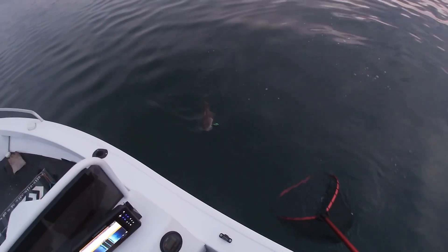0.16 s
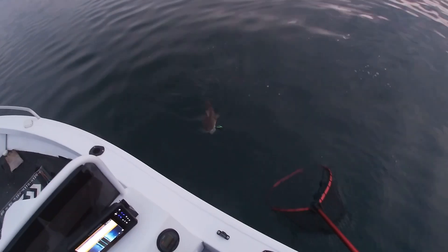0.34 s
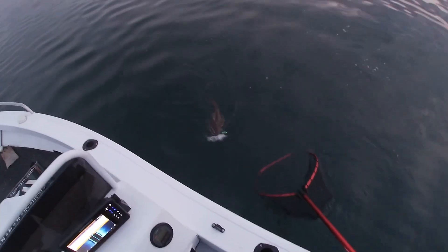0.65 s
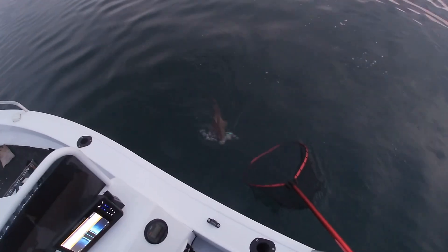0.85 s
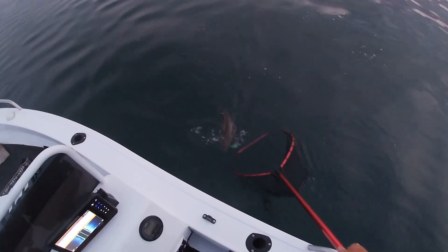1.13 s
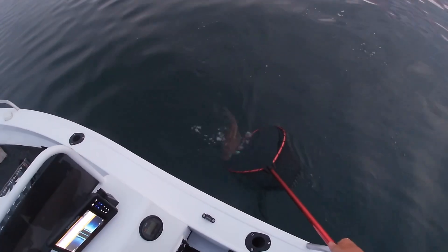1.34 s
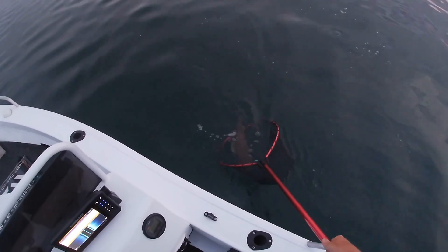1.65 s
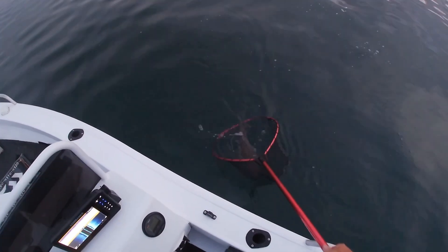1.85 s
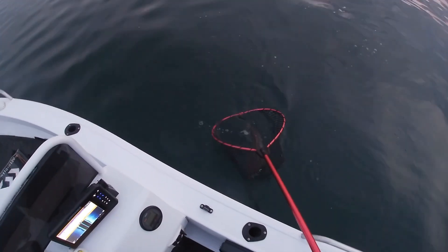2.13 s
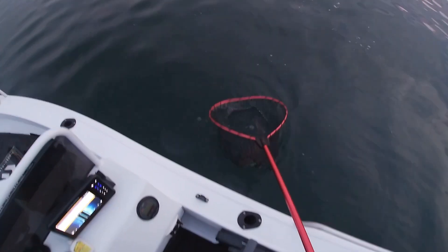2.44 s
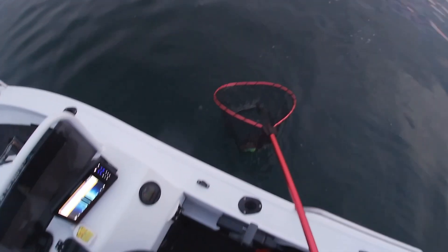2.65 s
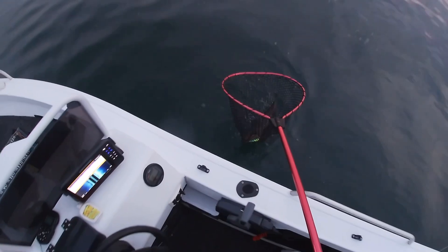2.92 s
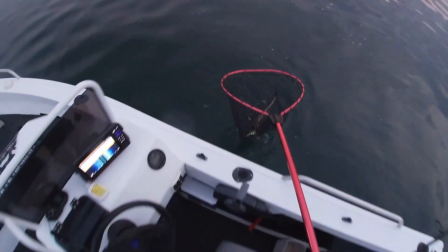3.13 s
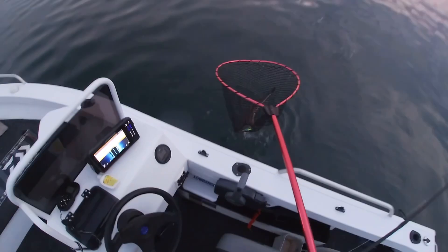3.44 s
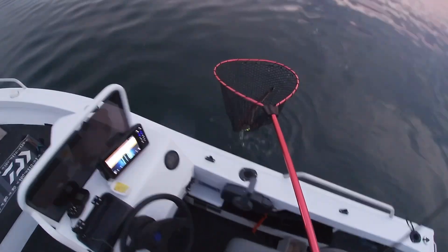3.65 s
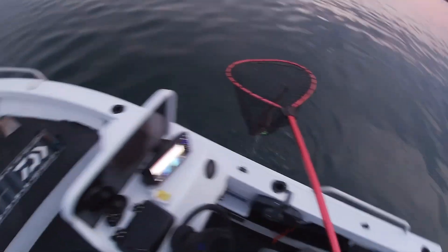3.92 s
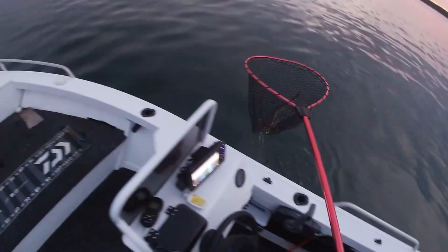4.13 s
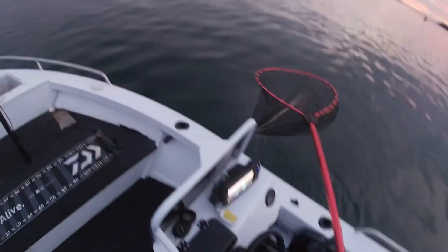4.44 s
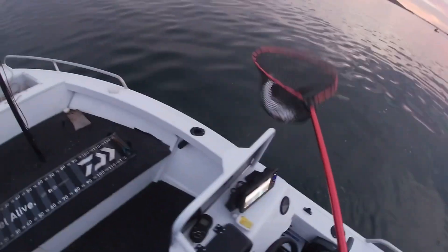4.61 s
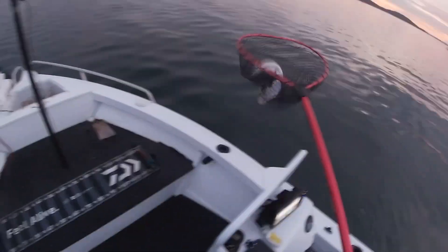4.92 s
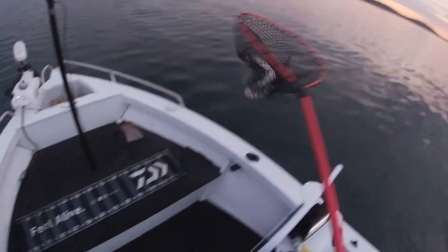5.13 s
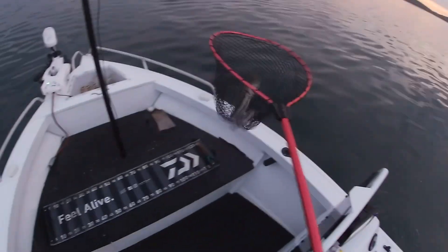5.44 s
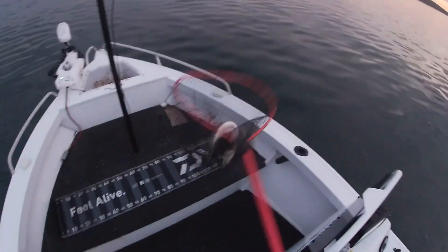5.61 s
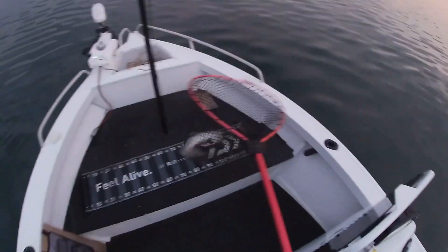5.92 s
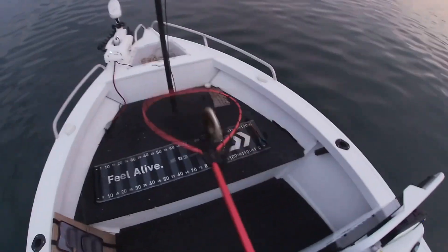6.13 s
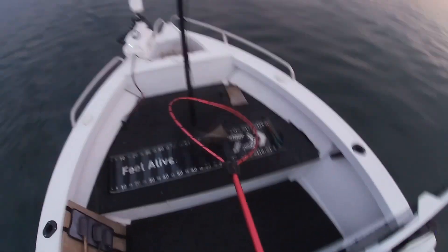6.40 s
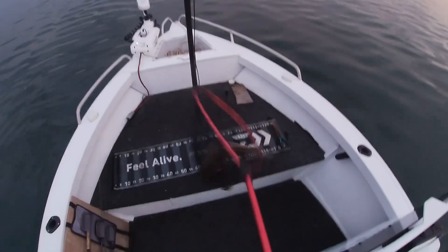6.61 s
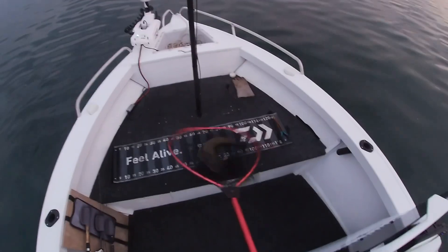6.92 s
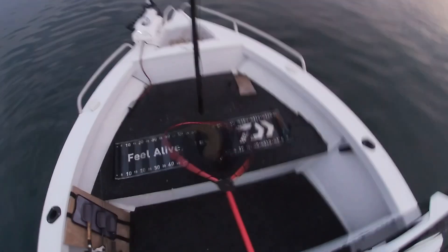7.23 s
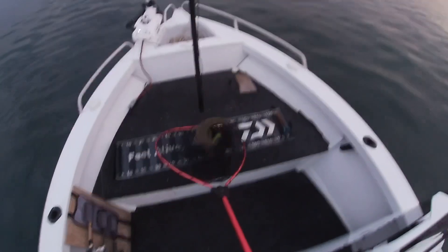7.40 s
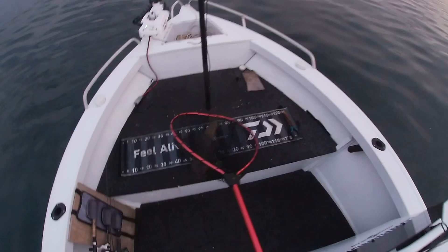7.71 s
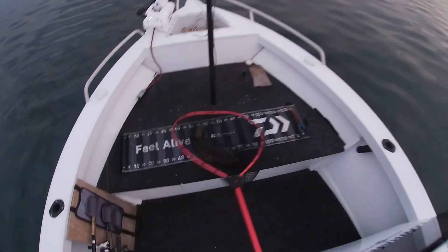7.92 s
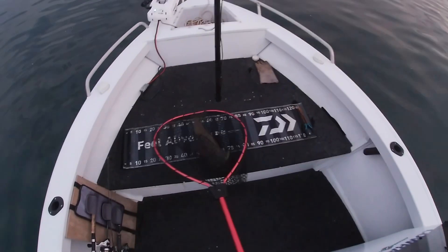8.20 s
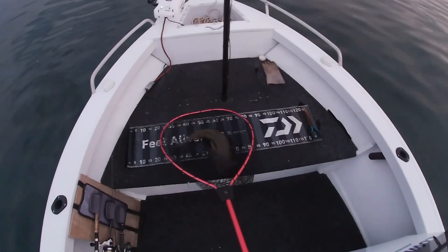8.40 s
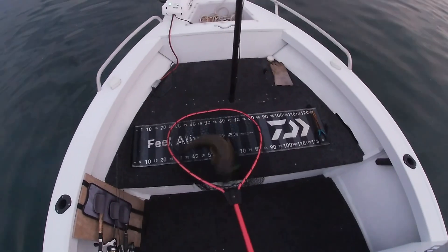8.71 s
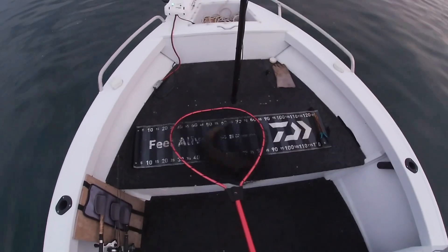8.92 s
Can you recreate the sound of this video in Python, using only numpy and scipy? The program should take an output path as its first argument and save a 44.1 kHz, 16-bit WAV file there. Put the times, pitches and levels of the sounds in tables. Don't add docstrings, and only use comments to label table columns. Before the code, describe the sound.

Outdoors on a quiet boat, heard close through a muffling case: faint hiss and low slosh against the hull, a small slap in the water, gurgling air. Water streams and drips off a lifted net, thinning to higher drops. Wet mesh whips and clicks in the air, a hoop knocks, then drumlike deck thuds, lid raps and wet slaps continue irregularly, gradually weakening as the fish tires.

```python
import sys
import numpy as np
from scipy import signal
from scipy.fft import rfft, irfft
from scipy.io import wavfile
from scipy.ndimage import uniform_filter1d

SR = 44100
rng = np.random.default_rng(int(sys.argv[2]) if len(sys.argv) > 2 else 0)


def output_pcm(signal):
    pcm = np.clip(np.atleast_2d(signal).T, -1, 1) * 32767
    wavfile.write(sys.argv[1], SR, np.round(pcm).astype(np.int16))


def ratio(d):
    e = np.asarray(d, float) / 20
    return 10 ** e


N = 399369
T = np.arange(N) / SR
NET_LIFTS_S = 2.8
OVER_WATER_S = 4.4


def unit(x):
    return x / np.sqrt(np.mean(x ** 2))


def colour(x, shape):
    hz, db = np.transpose(shape)
    log_hz = np.log(np.arange(1, 2050) * SR / 4096)
    cepstrum = irfft(np.interp(log_hz, np.log(hz), db) * np.log(10) / 20)
    cepstrum[1:2048] *= 2
    cepstrum[2049:] = 0
    response = irfft(np.exp(rfft(cepstrum)))
    return signal.fftconvolve(x, response)[:N]


def band(x, lo_hz, hi_hz, order=2):
    sos = signal.butter(order, [lo_hz, hi_hz], "bandpass", fs=SR, output="sos")
    return unit(signal.sosfilt(sos, x))


def walk(rate):
    k = int(SR / rate)
    steps = np.repeat(rng.standard_normal(N // k + 1), k)
    return unit(uniform_filter1d(uniform_filter1d(steps, k), k)[:N])


def grains(rate, spread_db, wash):
    size = ratio(spread_db * rng.exponential(size=N).clip(0, 4.5))
    return unit(size * (rng.random(N) < rate / SR)) + wash


def add(out, s, db, hz, swell, t60, glide, hold=0):
    i = int(s * SR)
    t = np.arange(min(int((swell + hold + t60) * SR), N - i)) / SR
    rise = np.sin(np.pi / 2 * np.minimum(t / swell, 1))
    fall = ratio(-60 * np.maximum(t - swell - hold, 0) / t60)
    pitch = np.minimum(hz * 2 ** (glide * t), 2.2 * hz)
    out[i:i + len(t)] += ratio(db) * rise * fall * np.sin(2 * np.pi * np.cumsum(pitch) / SR)


def add_burst(out, s, db, lo_hz, hi_hz, order, t60, length):
    i, t = int(s * SR), np.arange(length) / SR
    noise = band(rng.standard_normal(length), lo_hz, hi_hz, order)
    out[i:i + length] += noise * ratio(db - 60 * t / t60) * np.minimum(t / 0.0008, 1)


# (t/s, rocking level/dB, slosh level/dB)
LAPPING = [(0.0, -43, -37.5), (0.4, -32, -40.5), (0.85, -45.5, -41), (1.69, -36.5, -35), (1.91, -41.5, -40),
           (2.49, -47, -42), (2.97, -41.5, -43.5), (3.53, -43, -40.5), (4.49, -34, -38.5),
           (4.84, -28.5, -36), (5.59, -35.5, -43.5), (5.9, -40.5, -37.5), (6.35, -35.5, -46.5),
           (6.75, -33.5, -35), (7.64, -31, -39.5), (7.86, -31, -39.5), (8.44, -39, -43.5),
           (9.05, -40.5, -38.5)]
# (f/Hz, level/dB per Hz)
HISS_TONE = [(300, -26), (460, -29), (750, -43), (1020, -48.5), (1900, -50.5), (2760, -37.5), (3100, -41.5),
             (3500, -41.5), (4600, -55.5), (6700, -62), (8300, -81), (13500, -82.5)]


def hull():
    s, roll_db, slosh_db = np.transpose(LAPPING)
    roll_db, slosh_db = np.interp(T, s, roll_db), np.interp(T, s, slosh_db)
    surge = 1.3 * walk(9)
    flicker = surge + 2.8 * walk(30)
    roll = band(rng.standard_normal(N), 27.3, 76.8) * ratio(roll_db - 4 + surge + 3 * walk(8))
    slosh = band(rng.standard_normal(N), 85.8, 230.4, order=3) * ratio(slosh_db + surge + 1.5 * walk(15))
    gurgle = band(rng.standard_normal(N), 210, 716, order=3) * ratio(slosh_db - 22 + flicker)
    hiss_db = -52.5 + .8 * walk(6) - 2.5 * np.clip(T - NET_LIFTS_S, 0, 1)
    hiss = unit(colour(rng.standard_normal(N), HISS_TONE)) * ratio(hiss_db)
    ticking = uniform_filter1d(grains(21, 3.5, 0.22), size=200) * ratio(-77 + 2 * walk(3.04))
    return roll + slosh + gurgle + hiss + ticking * band(rng.standard_normal(N), 3400, 11000)


# (t/s, peak level/dB, f/Hz)
HULL_LURCHES = [(0.163, -25, 46.5), (0.453, -35, 61), (0.672, -39, 59.2), (1.742, -33, 69.5),
                (3.352, -34, 38.5), (4.415, -37, 38), (4.668, -22, 46.8), (5.257, -40, 48),
                (5.51, -27, 51.1), (5.935, -23, 67.6), (6.724, -19, 67), (7.516, -26, 61.3),
                (7.676, -22, 48.4), (8.355, -33.5, 67.3), (8.593, -26.5, 47)]


def lurches():
    out = np.zeros(N)
    for s, db, hz in HULL_LURCHES:
        add(out, s, db + 0.5, hz, swell=1.37 / hz, t60=9 / hz, glide=-1.5)
    return out


# (t/s, peak level/dB, f/Hz)
SPRAY_TICKS = [(0.1381, -57, 6730), (1.2905, -56.5, 6550), (2.1854, -57, 6000), (2.7057, -52, 5420),
               (2.831, -58, 5900), (3.925, -39, 8300), (4.022, -42, 7300), (4.316, -45, 7500)]


def spray_ticks():
    out = np.zeros(N)
    for s, db, hz in SPRAY_TICKS:
        add(out, s, db + 2.5, hz, swell=.0006, t60=.009, glide=0)
    return out


# (t/s, peak level/dB, f/Hz, t60/s)
FISH_SPLASH = [(.7205, -20, 1313, 0.013), (.7212, -28.5, 3000, .012), (.7235, -37, 4880, 0.0068),
               (.726, -22, 970, 0.01), (.739, -33.5, 730, 0.0099), (.739, -37, 3170, 0.0091)]


def splash():
    out = np.zeros(N)
    for s, db, hz, t60 in FISH_SPLASH:
        add(out, s, db, hz, swell=.0015, t60=t60, glide=-25)
    return out


# (t/s, peak level/dB, f/Hz, swell/s, t60/s)
AIR_GULPS = [(.757, -45, 520, 0.0097, 0.081), (.785, -40.5, 360, 0.0079, 0.073),
             (0.814, -35, 260, 0.0072, 0.062), (0.978, -28.5, 200, 0.036, 0.14),
             (3.119, -40.5, 333.6, 0.014, 0.18), (4.135, -35.5, 402, 0.0039, 0.041),
             (4.21, -53, 675, 0.0098, 0.14)]


def gulps():
    out = np.zeros(N)
    for row in AIR_GULPS:
        add(out, *row, glide=1.5)
    return out


# (t/s, peak level/dB, f/Hz, glide/octaves per s)
AIR_BUBBLES = [(0.118, -48, 563, -12), (0.405, -47.5, 780, 22.5), (.433, -44, 814, 18.5),
               (.457, -55, 885, 9), (.478, -53, 873, 4), (.735, -52, 760, -14), (.812, -46, 900, 29),
               (0.965, -46, 798, 3.5), (1.138, -51, 1430, -14), (1.31, -58, 1280, 6),
               (1.779, -48.5, 1730, 13), (2.03, -46.5, 735, 2.5), (2.041, -42.5, 427, 9),
               (2.998, -38.5, 2140, 5), (3.059, -38.5, 910, 8.5), (3.084, -37, 380, -3),
               (3.525, -56, 950, 4), (3.934, -49, 1940, 6), (3.296, -49, 1380, -11), (3.369, -39, 320, 2.5),
               (3.905, -42, 520, 2.5), (3.585, -42.5, 698, 11), (3.9, -38, 326, 3),
               (3.904, -38, 1300, -0.5), (3.983, -52, 1270, 10), (4.182, -39, 1970, 2),
               (4.247, -48, 1330, -10), (6.872, -29, 757, -16), (3.04, -49, 645, 7.5),
               (5.872, -43, 240, -0.5), (5.871, -41.5, 476, 0), (3.275, -39, 1760, -1.5),
               (4.81, -29, 1730, 2)]


def bubbles():
    out, chirp = np.zeros((2, N))
    for s, db, hz, glide in AIR_BUBBLES:
        cycles = 52 + .3 * abs(glide)
        add(out, s, db, hz, 0.9 / hz, cycles / hz, glide)
    chirp_s, chirp_length_s = 3.221, .046
    add(chirp, chirp_s, -43, 830, swell=.004, t60=.35, glide=28)
    return out + chirp * np.clip((chirp_s + chirp_length_s - T) / 0.0084, 0, 1)


# (t/s, peak level/dB, f/Hz)
BUBBLE_POPS = [(2.8903, -46, 2530), (2.915, -39, 1860), (2.9362, -38, 1660), (2.969, -40, 1120),
               (2.9986, -35, 2140), (3.0206, -25, 2670), (3.0591, -34, 940), (3.139, -40, 1130),
               (3.2196, -43, 890), (3.258, -30.5, 1850), (3.2969, -29.5, 1890), (3.3203, -43, 2160),
               (3.3364, -35, 1370), (3.3533, -35, 1740), (3.3772, -27, 2380), (.868, -38, 2900),
               (3.655, -41, 1250), (3.5254, -36.5, 925), (3.5718, -49, 2100), (3.5842, -47, 902),
               (3.6016, -41, 2350), (3.6236, -38, 940), (3.7, -47, 1090), (3.657, -38, 1800),
               (3.8561, -43, 1640), (3.9026, -42, 1380), (3.934, -47, 1960), (3.9854, -50, 1290),
               (4.0701, -42, 2370), (4.1824, -39, 1960), (4.061, -53, 890), (4.2417, -44, 1290),
               (4.274, -42, 1210), (4.2956, -45, 2390), (4.352, -30, 1780)]


def pops():
    out = np.zeros(N)
    for s, db, hz in BUBBLE_POPS:
        add(out, s, db - 4.0, hz, swell=0.68 / hz, t60=24 / hz, glide=6)
    return out


# (t/s, level/dB)
DRAINING = [(2.8, -78), (2.92, -51.5), (3.05, -43.5), (3.16, -58), (3.33, -50.5), (3.46, -58), (3.7, -58.5),
            (4.33, -52), (4.42, -40.5), (5.72, -38), (5.9, -42.5), (6.02, -36), (6.27, -43.5), (6.6, -32),
            (6.9, -43.5), (7.45, -43), (8.05, -40), (8.29, -41.5), (9.06, -40)]


def drain():
    s, db = np.transpose(DRAINING)
    stream_hz, thin_hz, thins_s, thinning_s = 1770, 5080, 3.755, 0.072
    swarm = np.zeros(N)
    for when, octave, size, cycles in rng.random((800, 4)):
        at = NET_LIFTS_S + when * (OVER_WATER_S - NET_LIFTS_S)
        centre = stream_hz + (thin_hz - stream_hz) / (1 + np.exp((thins_s - at) / thinning_s))
        pitch = centre * 2 ** (2.14 * (octave - .35))
        add(swarm, at, 7 * size ** 3 - 21, pitch, 1.5 / pitch, (8 + 30 * cycles ** 3) / pitch, 6)
    fizz = band(grains(1500, 3, .8) * rng.standard_normal(N), 610, 7500, order=1)
    both = ratio(22.5) * swarm + ratio(-11.0 - 2.5 * (T < OVER_WATER_S)) * fizz
    return both * ratio(np.interp(T, s, db, left=-120) + 2.2 * walk(30))


# (t/s, peak level/dB, f/Hz)
WATER_DRIPS = [(2.9436, -37, 2030), (2.975, -39, 2130), (3.694, -31.5, 3960), (3.0598, -50, 2800),
               (3.2275, -41, 2650), (3.2579, -40, 3150), (3.2963, -40, 2030), (3.354, -33, 2050),
               (3.3756, -33, 2500), (3.475, -33.5, 3530), (3.033, -55, 3400), (3.5867, -38, 3600),
               (3.6005, -30.5, 2360), (3.6334, -39, 4460), (3.648, -29, 2970), (3.6847, -27.5, 3600),
               (3.7374, -32.5, 5600), (3.819, -31.5, 3840), (3.854, -27, 4760), (3.8948, -26.5, 4280),
               (3.9224, -30.5, 2060), (3.994, -35, 5930), (4, -33, 2910), (4.049, -41, 6300),
               (4.0691, -35, 5500), (4.112, -32.5, 4660), (4.1818, -37, 2200), (4.207, -40, 6860),
               (4.296, -38, 2390), (4.3552, -32.5, 2100)]
# (t/s, peak level/dB, f/Hz)
FLUNG_DROPS = [(0.72, -24.5, 1570), (4.182, -38, 2900), (4.954, -31, 1400), (5.077, -26, 5830),
               (5.434, -27, 2900), (6.422, -36, 1270), (6.671, -27, 5930), (7.1004, -36, 1200),
               (7.1534, -29, 2670), (7.298, -35, 1060), (8.743, -24, 1020), (4.783, -28, 1000),
               (3.384, -34.5, 2600), (8.4, -16, 960), (4.809, -23, 1810), (6.3844, -21.5, 935),
               (6.432, -29, 1250), (8.043, -24, 1010), (7.592, -16, 3710)]


def drops():
    out = np.zeros(N)
    for s, db, hz in WATER_DRIPS + FLUNG_DROPS:
        add(out, s, db - 7.0, hz, swell=.0007, t60=.012, glide=12)
        add_burst(out, s, db - 12.5, .7 * hz, 2.4 * hz, order=2, t60=0.045, length=1200)
    add(out, .15, -29.5, 12000, swell=.001, t60=.006, glide=0)
    return out


# (t/s, peak level/dB, panel f/Hz, swell/s)
DECK_BLOWS = [(5.81, -23, 174, 0.004), (5.943, -9.5, 269.6, 0.004), (5.943, -15, 414, 0.0015),
              (5.952, -11.5, 115.5, 0.0039), (5.955, -13.5, 206, 0.0098), (5.96, -29.5, 381, 0.011),
              (6.33, -31, 405, 0.01), (6.504, -11, 56, 0.011), (6.511, -11, 124, 0.0094),
              (6.73, -10.5, 115.5, 0.0072), (6.78, -16, 262, 0.012), (6.838, -12, 115.5, 0.0079),
              (6.93, -13.5, 121.6, 0.011), (7.072, -14, 56.6, 0.012), (7.244, -8, 856, 0.00068),
              (7.244, -13.5, 265, 0.0023), (7.247, -17, 471, 0.0028), (7.251, -15.5, 55.7, 0.0036),
              (7.52, -25.5, 119.6, 0.0072), (7.643, -26.5, 108, 0.004), (7.707, -25, 97.5, 0.0072),
              (7.777, -21, 116, 0.0018), (8.13, -26, 61.5, 0.036), (8.199, -22, 115, 0.017),
              (8.138, -24.5, 151, 0.0072), (8.629, -30, 191.4, 0.027)]


def deck():
    out, shake = np.zeros((2, N))
    for s, db, hz, swell in DECK_BLOWS:
        off = rng.standard_normal(2)
        t60 = 0.14 * (100 / hz)
        big = hz < 140
        add(out, s, db - 2.6 * big, hz, swell, t60, -.6, hold=0.017 * big)
        add(out, s, db - 10.5, 1.59 * hz * (1 + 0.063 * off[0]), 0.59 * swell, t60, 0)
        add(out, s, db - 17.5, 2.67 * hz * (1 + 0.11 * off[1]), 0.42 * swell, 0.54 * t60, 0)
        i = int(s * SR)
        late = T[:min(SR // 2, N - i)]
        fade = ratio(2 * db - 120 * late / (0.32 + 0.18 * t60))
        shake[i:i + len(late)] += fade * np.minimum(late / swell, 1)
    add(out, 5.812, -54, 2850, swell=.002, t60=.5, glide=0)
    add(out, 5.812, -50, 5020, swell=.002, t60=.5, glide=0)
    rumble = np.sqrt(shake) * band(rng.standard_normal(N), 56, 320) * ratio(-18.5)
    return out * ratio(1.5 * walk(90)) + rumble


# (t/s, peak level/dB, f/Hz)
LID_RAPS = [(6.337, -29.5, 1230), (6.386, -24, 960), (6.434, -23.5, 1260), (6.489, -28, 1370),
            (6.515, -15.5, 1060), (6.697, -24, 796), (6.756, -20, 1010), (6.777, -11.5, 1013),
            (6.87, -30, 885), (7.002, -25.5, 940), (7.071, -15, 1254), (7.127, -24, 960),
            (7.207, -26.5, 1005), (7.246, -16, 930), (7.43, -31, 890), (7.49, -27, 1050),
            (7.504, -16.5, 1123), (7.59, -23, 935), (7.678, -24.5, 1270), (7.709, -26, 800),
            (5.812, -16, 1050), (5.81, -12, 2200), (7.852, -24.5, 1030), (8.045, -21, 973),
            (8.134, -21, 1020), (8.168, -26.5, 1064), (8.399, -31, 987), (8.47, -25, 1060),
            (8.564, -28, 988), (8.661, -27, 1100), (8.743, -39, 990), (8.907, -30, 1080), (8.975, -26, 982)]


def raps():
    out = np.zeros(N)
    for s, db, hz in LID_RAPS:
        add(out, s, db - 5, hz, swell=.0012, t60=.03, glide=0)
    return out


# (t/s, peak level/dB, f/Hz)
TAUT_SNAPS = [(4.4702, -21.5, 2380), (4.5905, -4, 2800), (4.7207, -13, 2890), (4.8935, -7, 6840),
              (5.006, -16.5, 1780), (5.142, -25, 1920), (5.3596, -14, 4800), (5.5052, -14.5, 2500),
              (5.5456, -10.5, 2250), (5.6, -6, 7300), (5.6697, -13, 3480), (5.8091, -5, 2230),
              (5.9895, -8, 2810), (6.0311, -3.5, 2000), (6.1747, -15, 4170), (6.327, -18, 3060),
              (6.38, -26.5, 1930), (6.483, -20, 3260), (6.6253, -13, 2240), (6.6977, -19.5, 2230),
              (6.999, -9.5, 2880), (7.206, -22, 2490), (7.456, -17, 1890), (7.5903, -15, 3120),
              (7.616, -27, 2850), (7.707, -21.5, 2300), (7.7475, -19.5, 2900), (7.795, -18.5, 2200),
              (7.877, -13.5, 4300), (8.4747, -19, 1800), (8.567, -23, 2180), (8.8146, -26, 1920),
              (8.952, -15.5, 1830)]


def snaps():
    out = np.zeros(N)
    for s, db, hz in TAUT_SNAPS:
        add(out, s, db - 6.5, hz, swell=.0003, t60=.005, glide=-20)
        add_burst(out, s, db - 10.5, 900, 11000, order=1, t60=0.01, length=400)
    return out


def beads(shaking):
    out = np.zeros(N)
    for when, octave, size, slide in rng.random((700, 4)):
        at = OVER_WATER_S + when * (T[-1] - OVER_WATER_S)
        pitch = 1100 * 2 ** (2.6 * octave)
        add(out, at, 14 * size, pitch, 1.5 / pitch, 22 / pitch, 30 * (slide - .3))
    return ratio(-13) * out * shaking


# (t/s, level/dB,
# fall/ms per 10 dB, dullness/dB)
MESH_WHIPS = [(0.72, -40, 20, 14.5), (.869, -49.5, 3.5, 23), (4.573, -38, 20, -3), (4.59, -21.5, 28.5, 1.5),
              (4.661, -38.5, 33, 4), (4.701, -40, 20, 4.5), (4.721, -26.5, 17.5, -3), (4.733, -24, 13, 0),
              (4.767, -26, 26, -1.5), (4.82, -36, 12, -7), (4.894, -21, 13, 1.5), (4.921, -34.5, 16, -1),
              (5.008, -29, 12.5, 2), (5.118, -22.5, 20, -0.5), (5.176, -29.5, 32, 0.5),
              (5.328, -26, 8, 1.5), (5.472, -27, 30.5, 5), (5.6, -31.5, 15.5, 3), (5.672, -29, 15.5, -1)]
# (t/s, level/dB, fall/ms per 10 dB, dullness/dB)
CARPET_SLAPS = [(5.943, -35, 74, 3.5), (5.809, -18, 12.5, 2), (6.032, -22, 10, -3.5),
                (6.149, -30, 34, -1.5), (6.33, -28.5, 17.5, -1), (6.382, -40, 23, 4.5),
                (6.485, -27.5, 15, 1), (6.514, -28, 19, 7), (6.571, -29, 15.5, -4),
                (6.625, -25, 11.5, -6.5), (6.747, -37, 47, 7.5), (6.777, -25.5, 7.5, 14),
                (6.87, -25, 11, 5), (7.002, -26.5, 22, -0.5), (7.063, -28, 24.5, 2.5),
                (7.126, -34, 11, -1.5), (7.244, -33.5, 13.5, 8), (7.296, -43.5, 44, 6),
                (7.435, -28.5, 9.5, 2), (7.488, -32.5, 11.5, 2), (7.59, -17, 3.5, -6),
                (7.796, -40.5, 31, 5), (9.011, -26.5, 14, 4.5), (8.044, -41.5, 16, 19), (8.119, -36, 8, -7),
                (8.134, -28, 6.5, 2.5), (8.336, -35.5, 25, 7.5), (8.4, -32.5, 27, -10.5),
                (8.663, -31, 22, 3), (8.908, -37.5, 5, 12)]
# (t/s of peak, level/dB, fall/ms per
# 10 dB, dullness/dB)
BODY_SWISHES = [(0.749, -52.5, 60, 7), (4.398, -31, 19.5, 2.5), (4.472, -38, 33, 1.5), (4.551, -38, 42, 4),
                (4.81, -43, 48, 8), (5.22, -26, 18, -0.5), (5.339, -29.5, 40.5, 0.5), (5.549, -20.5, 15, 1),
                (5.708, -28.5, 20, 1.5), (5.991, -22.5, 10, 3), (6.178, -37, 43, -3.5),
                (6.225, -32, 10, -2.5), (6.703, -34.5, 11, 6.5), (6.967, -35.5, 20.5, 2.5),
                (7.214, -33.5, 14, 1), (7.367, -38.5, 29, -1.5), (7.465, -26.5, 9, -1),
                (7.506, -35.5, 12.5, 9.5), (7.62, -28.5, 16, 2.5), (7.711, -24, 13, -0.5),
                (7.75, -25, 13.5, -2), (8.007, -29.5, 40.5, 0.5), (8.108, -29.5, 11, 0),
                (8.167, -38.5, 56, 5), (8.248, -37, 8, 1.5), (8.473, -32.5, 19.5, 5.5),
                (8.593, -31, 27.5, 4), (8.645, -33.5, 23.5, 3.5), (8.829, -34.5, 15, 5.5),
                (8.979, -20.5, 30.5, -0.5), (7.871, -30.5, 23.5, 2.5)]


def mesh():
    slap, rasp, spray = np.zeros((3, N))
    flaps = [(2.5, *row) for row in MESH_WHIPS]
    flaps += [(1.44, *row) for row in CARPET_SLAPS]
    flaps += [(0.72 * row[2], *row) for row in BODY_SWISHES]
    for rise, s, db, fall, dull_db in flaps:
        slap_db, spray_db = min(-3.5 + 0.86 * dull_db, 13.5), 0.55 - dull_db
        near = slice(max(int((s - .15) * SR), 0), int((s + .2) * SR))
        ms = 1000 * (T[near] - s)
        fade = np.where(ms < 0, -ms / max(rise, .15), (np.abs(ms) / max(fall, 1)) ** 1.23)
        crack = 1 + 3.4 / (1 + max(rise, 0)) * (ms > 0) * np.exp(-np.abs(ms) / 0.83)
        power = crack * ratio(2 * db - 20 * fade)
        share = 1 / (1 + ratio(2 * spray_db))
        slap[near] += power * share * ratio(2 * slap_db)
        rasp[near] += power * share
        spray[near] += power / np.sqrt(crack) * (1 - share)
    slap += ratio(2 * -50 + 10.5 * walk(25)) * (T > 6.7)
    low, mid, top = grains(3800, 3.24, 0.49) * rng.standard_normal((3, N))
    on_deck = T > 5.9
    body = band(low, 255, 1750) + ratio(-8.5) * on_deck * band(low, 715, 1410)
    patchy = ratio(2.15 * walk(70))
    slow_slap = uniform_filter1d(slap, size=600, origin=299).clip(0)
    sound = ratio(-2.5) * np.sqrt(slap) * body
    sound += ratio(-1.15) * patchy * np.sqrt(rasp) * band(mid, 1490, 4600)
    sound += ratio(1.1 + 2.5 * walk(90)) * np.sqrt(spray) * band(top, 4100, 15000)
    sound += ratio(-7.5) * np.sqrt(slow_slap) * band(low, 43, 458)
    return sound * ratio(1.6 * walk(150)), np.sqrt(rasp + spray)


# (f/Hz, level/dB)
HOUSING_TONE = [(300, 2.5), (600, 2.5), (1000, 1.5), (1250, -1.95), (2800, -1), (4500, -2.5), (6600, -1),
                (8300, -13.5), (12700, -29.5), (16000, -37)]


def housing(x):
    return colour(x, HOUSING_TONE)


def highpass(x, order, hz):
    return signal.sosfiltfilt(signal.butter(order, hz, "highpass", fs=SR, output="sos"), x)


def scene():
    low = hull() + lurches() + deck()
    rippled = (bubbles() + drops()) * ratio(3.2 * walk(260))
    water = spray_ticks() + splash() + gulps() + pops() + drain() + rippled
    flaps, shaking = mesh()
    bright = water + raps() + snaps() + beads(shaking) + flaps
    bright = bright + ratio(-26.5) * np.roll(bright, int(0.0032 * SR))
    mono = housing(bright) + low
    stray = housing(bright * np.sign(rng.standard_normal(N)))
    air = highpass(stray - .4 * mono, 8, 11500)
    side = ratio(-26.5) * highpass(stray, 12, 1050) + ratio(-3) * air
    return mono + np.array([side, -side])


def low_pass(x):
    return signal.sosfilt(signal.butter(12, 16100, fs=SR, output="sos"), x)


def record(dry):
    mix = np.tanh(1.28 * dry) / 1.107
    return low_pass(mix)


dry = scene()
out = record(dry)
output_pcm(out)
```